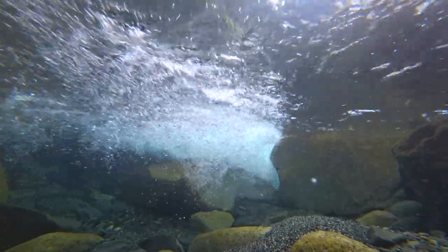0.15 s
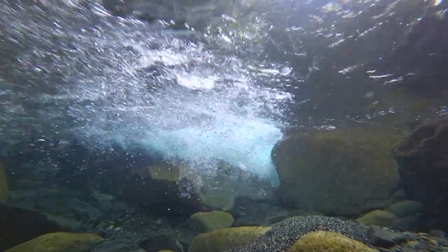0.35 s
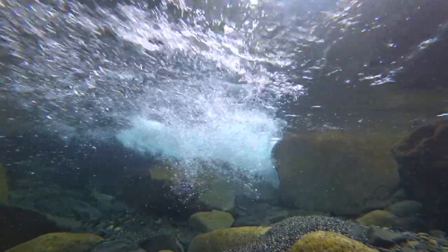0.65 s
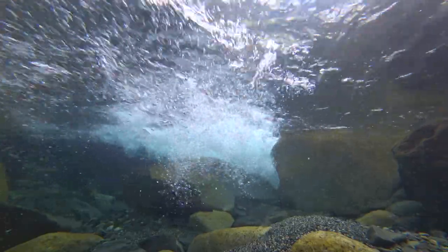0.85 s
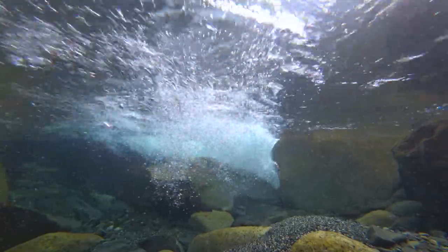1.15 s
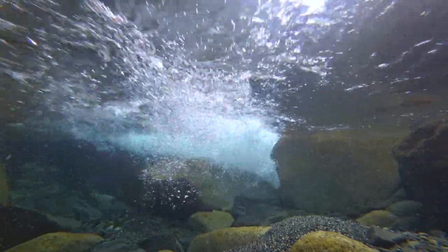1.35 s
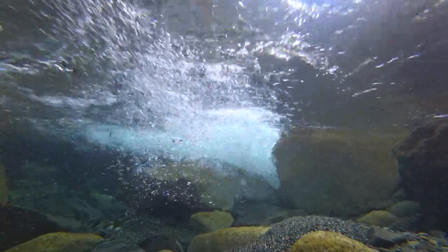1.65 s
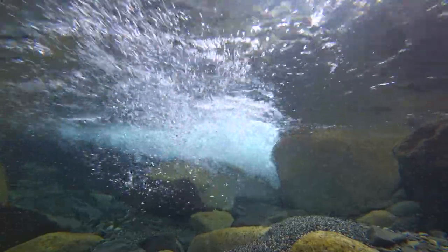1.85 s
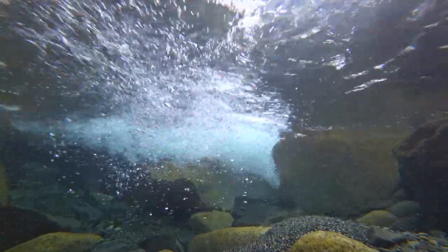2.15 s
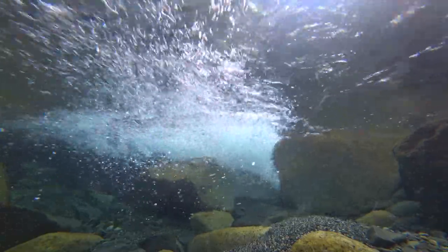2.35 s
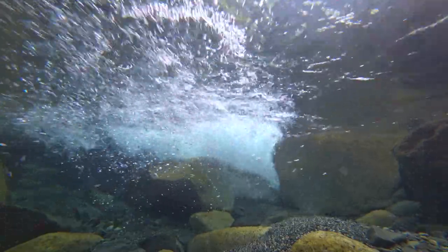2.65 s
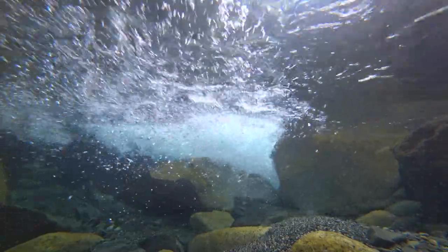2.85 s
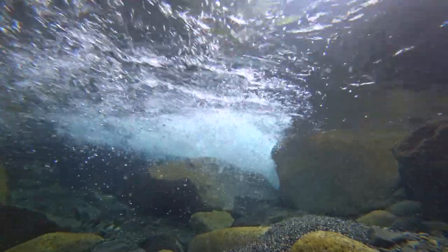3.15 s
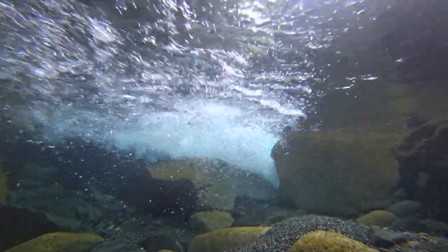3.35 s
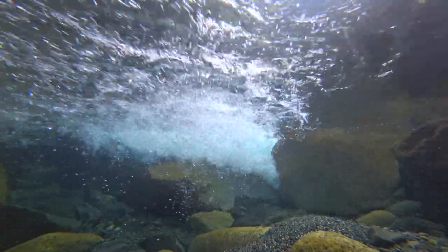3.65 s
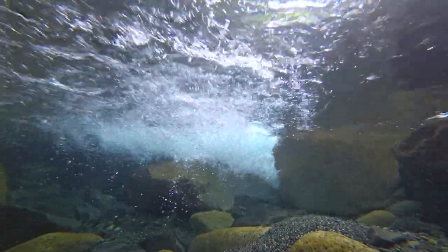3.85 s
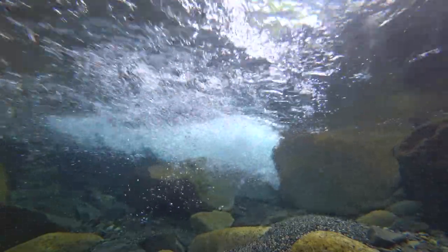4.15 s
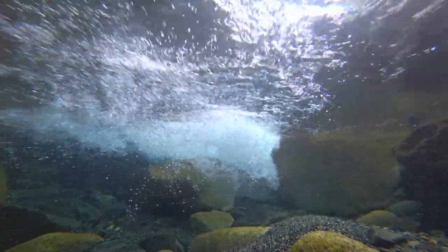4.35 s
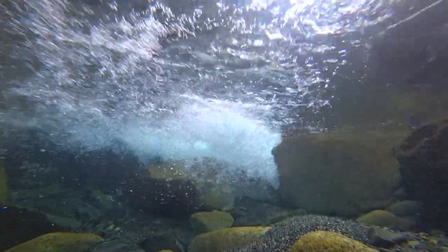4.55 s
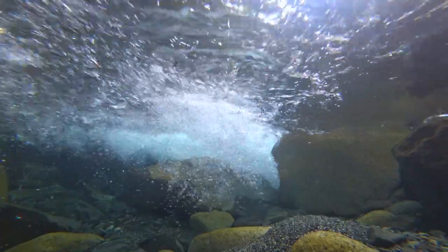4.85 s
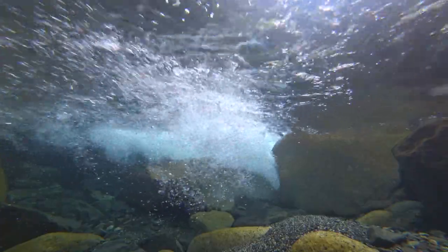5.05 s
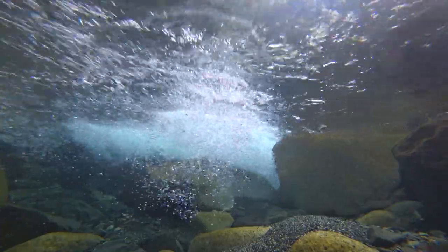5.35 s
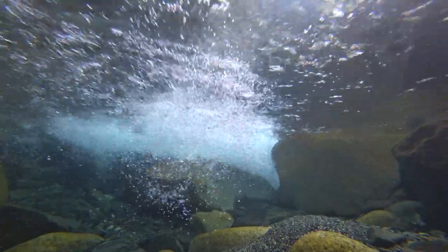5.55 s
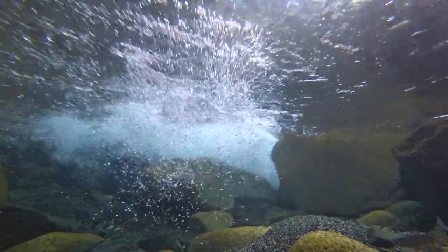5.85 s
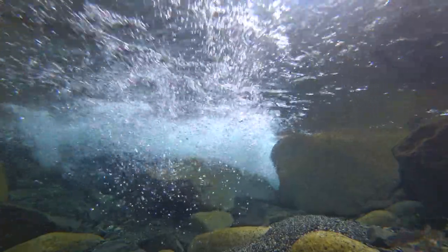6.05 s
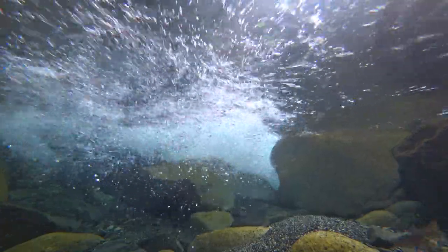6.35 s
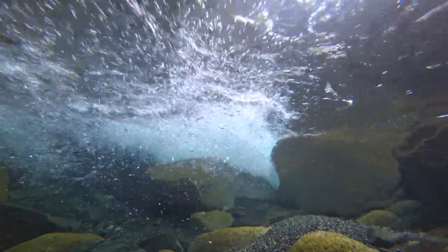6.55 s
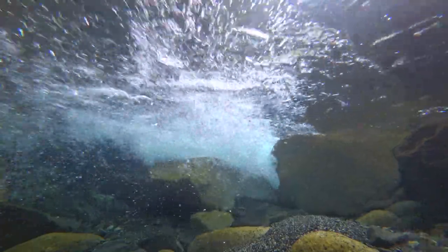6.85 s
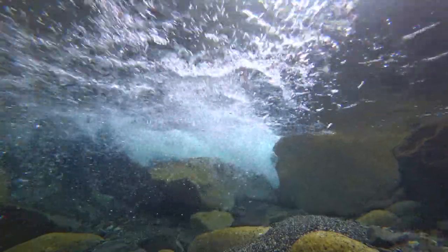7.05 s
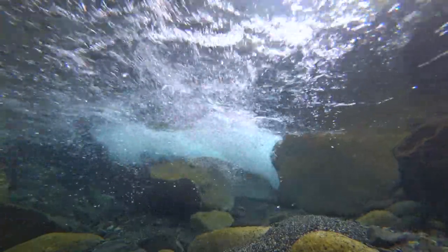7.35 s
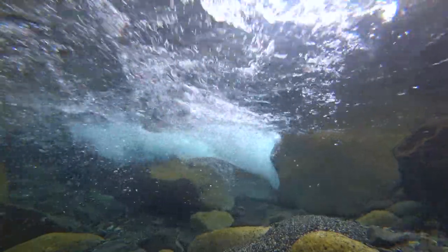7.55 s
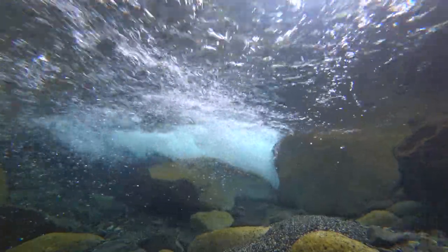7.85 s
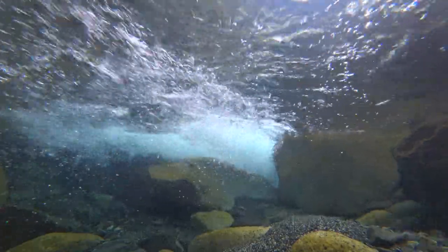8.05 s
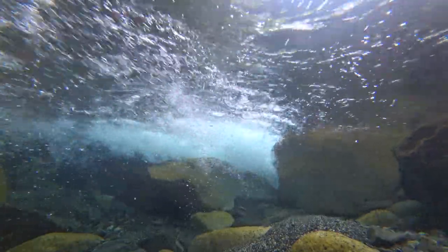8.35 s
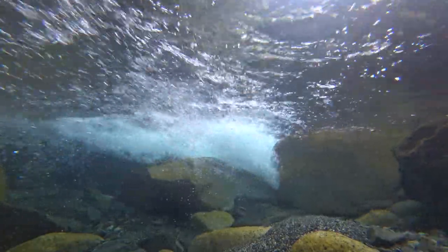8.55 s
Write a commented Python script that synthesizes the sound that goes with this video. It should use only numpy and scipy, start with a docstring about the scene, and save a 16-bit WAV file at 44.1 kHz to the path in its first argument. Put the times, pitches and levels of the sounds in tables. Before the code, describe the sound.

Muffled river water churns and gurgles throughout, heard underwater from inside a small housing that gives it a hollow, boxy tone. Countless bubbles blend together, with a light fizz and faint steady microphone hiss. The first 1.5 seconds churn hardest, with many short, ringing plops, a couple of light ticks and soft gulps around 0.7 and 1.1 seconds. Sharp knocks strike the housing at about 2.2 and 2.4 seconds, and a lighter one at 3.1, among more close bubbles. The water swells near 2.7 and 3.9 seconds, then eases from 5 to 7 with fewer plops. At 7.2 seconds a big air pocket gives a hollow gulp and ringing plop, toward the left. The churning rises again, and from 8.4 to 8.6 seconds comes a cluster of sharp clicks and the loudest bubble plops.

```python
"""A river heard under water

Water pours over rocks and drags air down, and the air rings as bubbles. Swarms of far ones gurgle, churn
and fizz, near ones plop and knock, and big air pockets gulp. We listen from inside a small camera housing
that muffles and colours the sound, differently for each of its two faintly hissing microphones."""
import sys
import numpy as np
from scipy import signal
from scipy.fft import rfft, irfft, next_fast_len
from scipy.io import wavfile

SR = 44100
rng = np.random.default_rng(int(sys.argv[2]) if len(sys.argv) > 2 else 0)


def pcm_store(signal):
    """Save signal as 16-bit PCM."""
    levels = np.round(np.clip(np.atleast_2d(signal), -1, 1) * 32767)
    wavfile.write(sys.argv[1], SR, levels.astype(np.int16).T)


N = 384552

# How hard the water churns; only the rise and fall around the average counts: time_s, level_db
CHURNING = [(0.0, -52.5), (0.39, -50), (0.7, -51), (1.16, -51), (1.77, -56.5), (2.45, -57.5), (2.69, -53.5),
            (3.42, -55.5), (3.86, -52.5), (5.22, -57), (5.54, -57.5), (6.22, -58.5), (7.02, -56.5),
            (7.21, -52.5), (7.75, -56), (8.26, -53.5), (8.43, -52.5), (8.72, -52)]
# How well the housing passes each pitch to each microphone: pitch_hz, gain_db
LEFT_WALL = [(150, -45), (330, -20), (400, -21.5), (470, -10), (560, -14.5), (670, 2.5), (900, -9),
             (1100, -2.5), (1450, -16.5), (1880, -9), (2700, -23), (4300, -32), (5300, -23.5), (8700, -34)]
RIGHT_WALL = [(150, -45), (400, -21), (470, -12.5), (550, -17), (670, -1), (790, -9.5), (860, -7),
              (1200, -10), (1450, -13.5), (1880, -15.5), (3100, -24), (4500, -31), (6900, -26), (8700, -30)]
# How the two microphones compare: pitch_hz, left_lead_radians, likeness_0_to_1
MIC_PAIR = [(254, -1.5, 0.43), (446, -2.5, 0.44), (629, -2.5, 1), (846, -2, 0.46), (967, -1.45, 0.48),
            (1315, -3.0, 0.91), (1800, -1.68, 0.89), (2860, -2.5, 0.64), (3100, -0.7, 0.72),
            (6330, -1.63, 1), (6950, 0.6, 0.26)]
# The colour of the microphone hiss: pitch_hz, relative_level_db, left_right_likeness_0_to_1
HISS_COLOUR = [(20, -20, 0.7), (65.6, -18, 0.7), (89.5, -3.5, 1), (144, -5.5, 0), (2870, 6.5, 0),
               (6900, 2, 0), (8650, -3.5, 0.9), (9540, 1, 0.32), (12100, 1, 0.25), (13900, -2.5, 0.93),
               (15900, -3, .95)]
# The faint whine of the electronics: pitch_hz, level_db
WHINE_TONES = [(6001, -87), (8421, -90), (12000, -92)]
# Big air pockets tearing off: start_s, relative_level_db
AIR_POCKETS = [(0.007, -62), (0.352, -65), (0.705, -55), (1.107, -56), (1.439, -61.5), (2.522, -61.5),
               (3.129, -63), (3.822, -63.5), (4.217, -63), (4.282, -62), (7.191, -47.5), (8.487, -60),
               (8.562, -63), (8.606, -57)]
# The low notes those pockets set ringing: pitch_hz, width_hz, relative_level_db
POCKET_NOTES = [(294, 55, -10.5), (340, 24, -5.5), (464, 14.4, 8.5), (535, 22, 8)]
# Short ringing tones close by, from near bubbles and from the housing ringing after a knock:
# start_s, pitch_hz, relative_level_db, swell_cycles
NEAR_TONES = [(0.012, 1004, -32.5, 3.9), (0.066, 2270, -42.5, 7.4), (0.067, 1010, -38, 3.4),
              (0.165, 1175, -29, 4.4), (0.205, 7300, -33.5, 3.2), (0.222, 954, -35, 4.6),
              (0.28, 1080, -33.5, 2), (0.307, 1810, -41, 5.1), (0.398, 1750, -35.5, 4.4),
              (0.403, 1210, -34.5, 3.5), (0.453, 837, -32.5, 3.8), (0.553, 7480, -41, 5.1),
              (0.556, 1510, -42, 3.5), (0.587, 1920, -43, 7.5), (0.629, 3500, -40.5, 5),
              (0.631, 1680, -36.5, 2.2), (0.728, 713, -35.5, 2.9), (0.807, 1030, -33, 2.7),
              (0.952, 484, -40.5, 6.7), (0.968, 7030, -35, 3.7), (1.012, 436, -40, 4), (1.056, 453, -47, 4),
              (1.117, 670, -35, 4.4), (1.118, 967, -39, 5), (1.227, 770, -38.5, 2.7),
              (1.247, 1880, -38.5, 4.3), (1.393, 2090, -43.5, 4), (1.445, 2250, -41, 5.5),
              (1.97, 1143, -38.5, 8.3), (2.177, 5650, -30, 1.2), (2.179, 1144, -30.5, 2.8),
              (2.31, 1140, -36, 1.8), (2.354, 1850, -36, 2), (2.355, 1160, -33.5, 2.05),
              (2.356, 3370, -35, 2.44), (2.471, 1840, -37.5, 5), (2.527, 770, -33.5, 1.76),
              (2.546, 683, -27, 4), (2.588, 593, -38.5, 7.7), (2.769, 674, -32, 6.4),
              (2.813, 675, -29.5, 7.7), (2.88, 1930, -32, 7), (2.993, 653, -42, 11.4),
              (2.998, 7200, -31.5, 1.7), (3.039, 1027, -42.5, 5.96), (3.132, 1930, -38, 3.2),
              (3.345, 676, -42, 5.9), (3.484, 6860, -35.5, 3.4), (3.567, 760, -32, 5.5),
              (3.681, 5170, -40, 2), (3.953, 737, -35, 3.6), (3.976, 720, -30.5, 7.5),
              (3.992, 1070, -34.5, 4.5), (4.557, 1047, -38, 3.7), (4.645, 710, -40, 4.2),
              (4.712, 5400, -43, 5.4), (4.774, 1960, -43.5, 5.5), (5.097, 732, -45, 5),
              (5.299, 5430, -47, 4.9), (5.398, 690, -40, 4), (5.534, 886, -31, 4.6), (5.552, 663, -42, 7.5),
              (5.726, 750, -44, 4.24), (6.358, 1010, -44, 4.3), (6.733, 1753, -37.5, 8.1),
              (7.041, 718, -27, 5.55), (7.195, 718, -21, 3), (7.214, 669, -34.5, 4.5), (7.24, 729, -32, 7),
              (7.274, 668, -37, 6.8), (7.613, 3260, -44, 3.3), (7.723, 1190, -35.5, 3.9),
              (7.811, 345, -53.5, 2.8), (8.018, 854, -41, 6), (8.142, 7300, -43, 3.9),
              (8.188, 6370, -43, 3.7), (8.333, 975, -40.5, 6.2), (8.421, 1565, -37, 6.8),
              (8.431, 7300, -31.5, 3.4), (8.449, 6180, -30.5, 2.2), (8.481, 907, -18.5, 3.5),
              (8.483, 806, -22.5, 4.64), (8.495, 1193, -28.5, 6.5), (8.554, 1674, -31, 4.4),
              (8.567, 990, -34, 2.87), (8.615, 810, -32, 1.8)]
# Which side those tones come from, with the low ones on the left: pitch_hz, left_over_right_db
TONE_SIDES = [(700, 5), (2000, 5.5), (6500, -2.5)]
# Sharp knocks on the housing: start_s, relative_level_db, decay_s, left_over_right_db
HOUSING_KNOCKS = [(0.6295, -41, 0.0079, -5), (1.442, -42, 0.007, 6), (2.1715, -32.5, 0.011, -3),
                  (2.3537, -28, 0.0053, 2), (3.132, -35, 0.006, 2), (8.421, -33, 0.0083, -2),
                  (8.4307, -36, 0.0091, 3), (8.613, -35, 0.0082, -3)]

CUTOFF_HZ = 15800
# The frequency of each point in a spectrum; the padding leaves room for ringing.
HZ = np.maximum(np.fft.rfftfreq(next_fast_len(N + 8192, True), 1 / SR), 1)


def from_db(db):
    """Turn decibels into a number to multiply by."""
    return 10 ** (np.asarray(db) / 20)


def rms_one(x):
    """Scale a sound so its average strength (rms) is 1."""
    return x / np.sqrt(np.mean(x ** 2) + 1e-20)


def over_hz(rows):
    """Fill in each column of a table for every frequency in HZ."""
    hz, *columns = np.transpose(rows)
    return [np.interp(np.log(HZ), np.log(hz), column) for column in columns]


def to_spectrum(x):
    """Split a sound into its frequencies."""
    return rfft(x, 2 * (len(HZ) - 1))


def to_sound(spectrum):
    """Join frequencies back into a sound."""
    return irfft(spectrum)[..., :N]


def band(low_hz, high_hz):
    """Gains that keep the pitches between two limits."""
    return 1 / np.sqrt((1 + (low_hz / HZ) ** 8) * (1 + (HZ / high_hz) ** 8))


def drift(rate_hz):
    """A smooth random wobble, about 1 in size."""
    step = 40  # samples between random points
    memory = np.exp(-2 * np.pi * step * rate_hz / SR)
    noise = rng.standard_normal(N // step + 2002)
    slow = signal.lfilter([1], [1, -2 * memory, memory ** 2], noise)[2000:]
    return np.interp(np.arange(N) / step, np.arange(len(slow)), rms_one(slow))


def add(out, start_s, sound):
    """Mix a short sound into a longer one."""
    i = int(np.clip(start_s * SR, 0, N - 1))
    out[:, i:i + sound.shape[-1]] += sound[..., :N - i]


def panned(pan_db):
    """Left and right gains; above 0 dB the left is louder."""
    return from_db([[pan_db / 2], [-pan_db / 2]])


def ringing(gain):
    """The phase that makes a filter ring after a blow and not before it."""
    cepstrum = irfft(np.log(gain / gain.max() + 1e-4))
    return np.exp(2j * to_spectrum(cepstrum[:len(HZ) - 1]).imag)


def housing(pair, gain):
    """The housing colours two unrelated sounds; its walls rock, putting the microphones out of step."""
    left, other = to_spectrum(pair)
    lead, alike = over_hz(MIC_PAIR)
    right = alike * left * np.exp(-1j * lead) + np.sqrt(1 - alike ** 2) * other
    walls = from_db([over_hz(LEFT_WALL)[0], over_hz(RIGHT_WALL)[0]])
    return to_sound(np.array([left, right]) * walls * gain * ringing(walls[0] * gain))


def ping(hz, swell_s):
    """A tone that swells, fades and sags like a pulsing bubble. Its sound is .real, its outline abs."""
    sag_per_cycle = .001
    t = np.arange(int(10 * swell_s * SR) + 2) / SR
    cycles = hz * (t - swell_s)
    phase = 2 * np.pi * cycles * (1 - sag_per_cycle * cycles / 2)
    return t / swell_s * np.exp(1 - t / swell_s + 1j * phase)


def far_bubbles(level_db, low_hz, high_hz, swell_cycles, spread_db, wash_db, eddy_db, count):
    """Many far bubbles ring over a wash of countless fainter ones, surging with the swirling water."""
    bubbles = np.zeros((2, N))
    for when, smallness, loud, length, turn_a, turn_b in rng.random((count, 6)):
        hz = low_hz * (high_hz / low_hz) ** smallness  # smaller bubbles ring higher and more briefly
        tone = hz * ping(hz, swell_cycles * (.5 + length) / hz)
        direction = np.exp(2j * np.pi * np.array([[turn_a], [turn_b]]))
        gain = from_db(spread_db * loud ** 2)  # only a few are loud
        add(bubbles, when * N / SR, gain * (tone * direction).real)
    wash = rng.standard_normal((2, N)) * np.sqrt(SR / 2 / (high_hz - low_hz))
    # Single bubbles stand out when the swarm comes close; in a lull the wash remains.
    closeness = from_db(0.6 * (level_db - level_db.mean()))
    wash_gain = from_db(wash_db)
    water = (closeness * rms_one(bubbles) + wash_gain * wash) / np.hypot(closeness, wash_gain)
    eddies = from_db(eddy_db * drift(rate_hz=20.0))
    return from_db(level_db) * rms_one(housing(water * eddies, band(low_hz, high_hz)))


def hollow_gurgle(level_db, hz, scatter, swell_cycles, spread_db, pan_db, count):
    """Large bubbles drift by, tuned close to the housing's own note, so they ring long and hollow."""
    bubbles = np.zeros((2, N))
    lead = np.interp(hz, HZ, over_hz(MIC_PAIR)[0])
    mics = panned(pan_db) * np.exp([[0], [-1j * lead]])
    for when, detune, loud, length in rng.random((count, 4)):
        pitch_hz = hz * (1 + scatter * (2 * detune - 1))
        tone = ping(pitch_hz, swell_cycles * (.5 + length) / pitch_hz)
        add(bubbles, when * N / SR, from_db(spread_db * loud) * (mics * tone).real)
    return from_db(level_db) * rms_one(bubbles)


def current_rumble(level_db, low_hz, high_hz):
    """The current pushes on the whole housing, so both microphones hear the same rumble."""
    pushes = to_spectrum(rng.standard_normal(N)) * band(low_hz, high_hz)
    return from_db(level_db) * rms_one(to_sound(pushes))


def microphone_noise(hiss_db):
    """The microphones hiss steadily, and the electronics add a few thin tones."""
    colour_db, alike = over_hz(HISS_COLOUR)
    shared, opposite = to_spectrum(rng.standard_normal((2, N))) * from_db(colour_db) * (HZ < CUTOFF_HZ)
    hiss = to_sound(np.sqrt(1 + alike) * shared + np.sqrt(1 - alike) * opposite * [[1], [-1]])
    t = np.arange(N) / SR
    whine = sum(from_db(db) * np.sqrt(2) * np.sin(2 * np.pi * hz * t) for hz, db in WHINE_TONES)
    return from_db(hiss_db) * rms_one(hiss) + whine


def gulps(gain_db, swell_s, pan_db):
    """A pocket of air tears off with a short shudder that sets low notes ringing."""
    shudders = np.zeros((1, N))
    age = np.arange(SR // 8) / SR / swell_s
    for start_s, db in AIR_POCKETS:
        add(shudders, start_s, from_db(db) * age * np.exp(1 - age))
    notes = sum(from_db(db) / (1 + 1j * (HZ / hz - hz / HZ) * hz / width)
                for hz, width, db in POCKET_NOTES) * band(328, 700)
    notes /= np.sqrt(np.mean(abs(notes) ** 2))
    left, other = to_spectrum(shudders * rng.standard_normal((2, N))) * notes
    lead = over_hz(MIC_PAIR)[0]
    right = (left * np.exp(-1j * lead) + other) / np.sqrt(2)
    return from_db(gain_db) * panned(pan_db) * to_sound(np.array([left, right]))


def near_tones(ring_db, thump_db, thump_stretch, lowest_hz):
    """Short tones close by: near bubbles ring and thump the housing, and it rings after a knock."""
    rings, thumps = np.zeros((2, N)), np.zeros((2, N))
    noise = rng.standard_normal((2, N))
    lead, side_db = over_hz(MIC_PAIR)[0], over_hz(TONE_SIDES)[0]
    for (start_s, hz, db, cycles), turn in zip(NEAR_TONES, rng.random(len(NEAR_TONES))):
        swell_s = cycles / hz
        # The loudest tones are bubbles brushing past the left microphone.
        pan_db = np.interp(hz, HZ, side_db) + 0.99 * max(db + 26.5, 0)
        tone = from_db(db) * ping(hz, swell_s) * np.exp(2j * np.pi * turn)
        out_of_step = np.exp([[0], [-1j * np.interp(hz, HZ, lead)]])
        add(rings, start_s, (tone * out_of_step * panned(pan_db)).real)
        if 550 < hz < 2500:  # only middle pitches come with a thump
            add(thumps, start_s, from_db(db) * abs(ping(hz, swell_s * thump_stretch)))
    # The stiff housing keeps out the bass, which rounds off the start of each ring.
    rings = signal.sosfilt(signal.butter(4, lowest_hz, "high", fs=SR, output="sos"), rings)
    return from_db(ring_db) * rings + from_db(thump_db) * housing(thumps * noise, band(230, 1680))


def knocks(gain_db):
    """Something small bursts or strikes right on the housing, making a short, bright crack."""
    cracks = np.zeros((2, N))
    t = np.arange(SR // 20) / SR
    for start_s, db, decay_s, pan_db in HOUSING_KNOCKS:
        add(cracks, start_s, from_db(db) * panned(pan_db) * np.exp(-t / decay_s))
    brightness = band(1030, 4700) * (HZ / 2000) ** .5
    return from_db(gain_db) * housing(cracks * rng.standard_normal((2, N)), brightness)


def scene():
    """Mix the far bubbles, the sounds close by, the current and the hiss."""
    churn_db = np.interp(np.arange(N) / SR, *np.transpose(CHURNING))
    surge_db = churn_db - churn_db.mean()
    # Large bubbles need hard churning, so a surge lifts the gurgle most and the fizz least.
    gurgle = far_bubbles(-69.0 + 1.65 * surge_db, low_hz=216, high_hz=536, swell_cycles=2.38,
                         spread_db=12.0, wash_db=-7.5, eddy_db=2.5, count=400)
    churn = far_bubbles(-49.5 + 1.07 * surge_db, low_hz=560.4, high_hz=2613, swell_cycles=4.007,
                        spread_db=13.5, wash_db=1.5, eddy_db=1.5, count=1900)
    fizz = far_bubbles(-60.0 + 0.83 * surge_db, low_hz=2670, high_hz=8500, swell_cycles=3.546,
                       spread_db=17.5, wash_db=0.5, eddy_db=1.93, count=2200)
    hollow = hollow_gurgle(-56.5 + 1.23 * surge_db, hz=691, scatter=0.0704, swell_cycles=8,
                           spread_db=13.5, pan_db=4.5, count=100)
    near = near_tones(ring_db=2.0, thump_db=1.0, thump_stretch=1.4, lowest_hz=297)
    blows = knocks(gain_db=20.5) + gulps(gain_db=7, swell_s=0.0065, pan_db=11.5)
    current = current_rumble(-92.5 + 1.4 * surge_db, low_hz=38.2, high_hz=117)
    return gurgle + churn + fizz + hollow + near + blows + current + microphone_noise(hiss_db=-59.5)


def record(dry):
    """Cut away the very highest treble."""
    return to_sound(to_spectrum(dry) / (1 + (HZ / CUTOFF_HZ) ** 300))


dry = scene()
out = record(dry)
pcm_store(out)
```